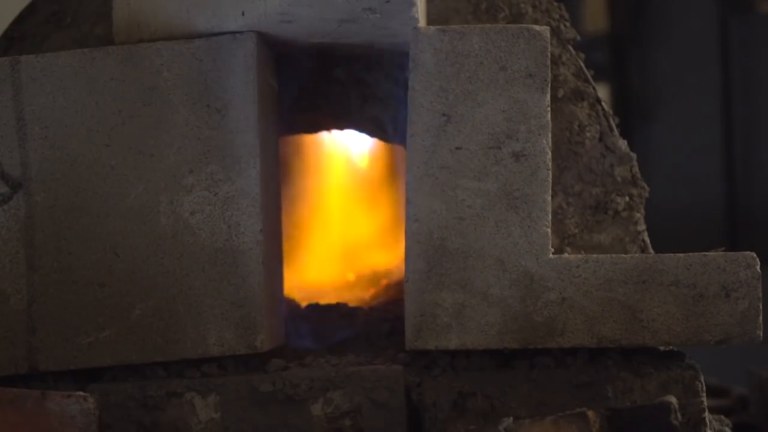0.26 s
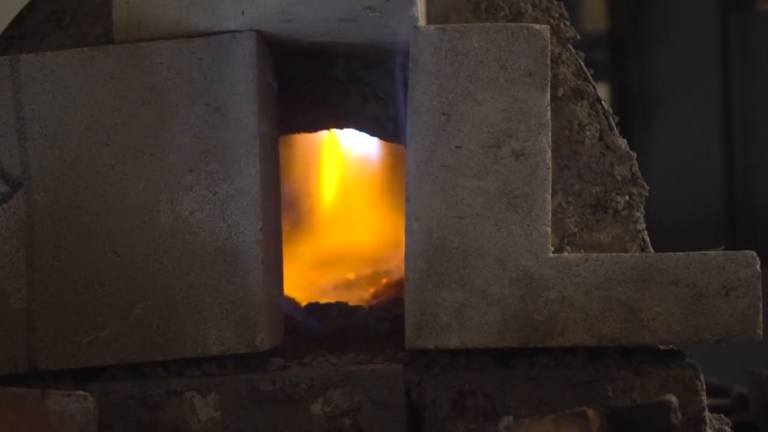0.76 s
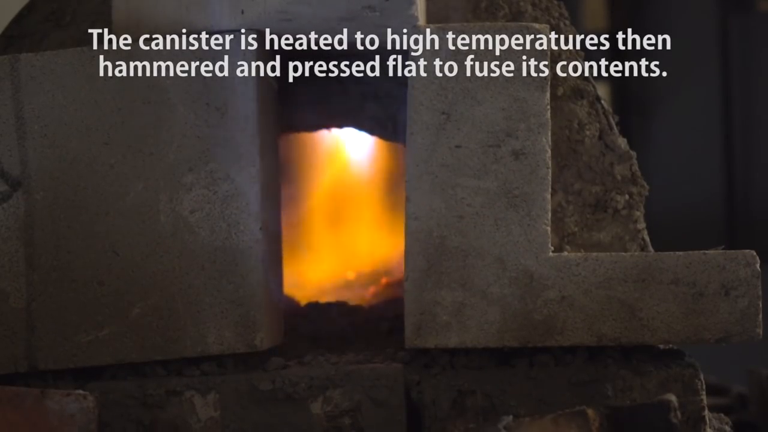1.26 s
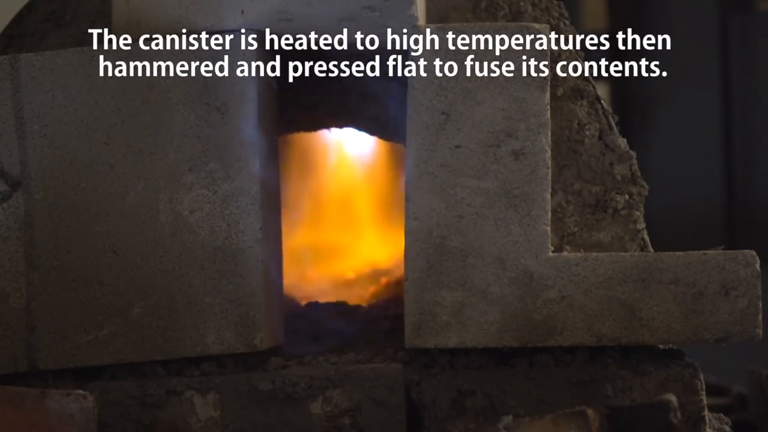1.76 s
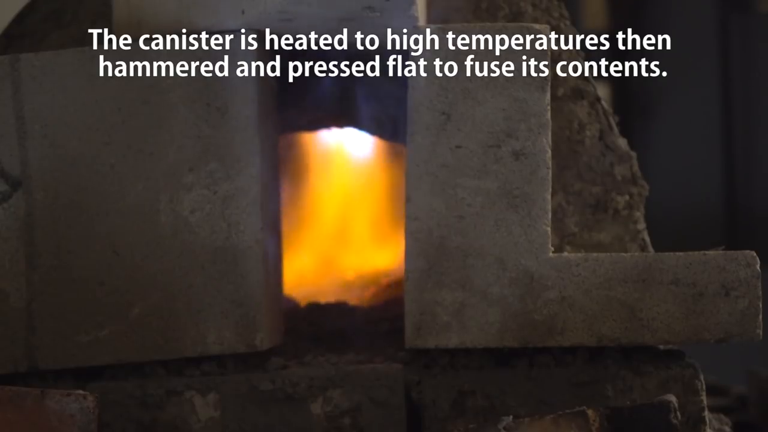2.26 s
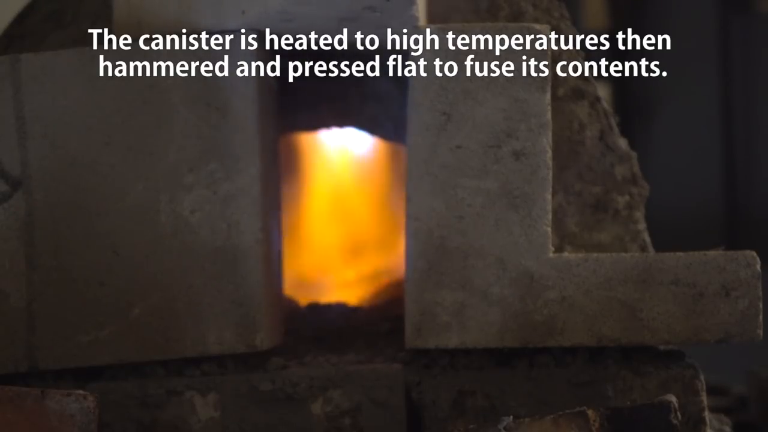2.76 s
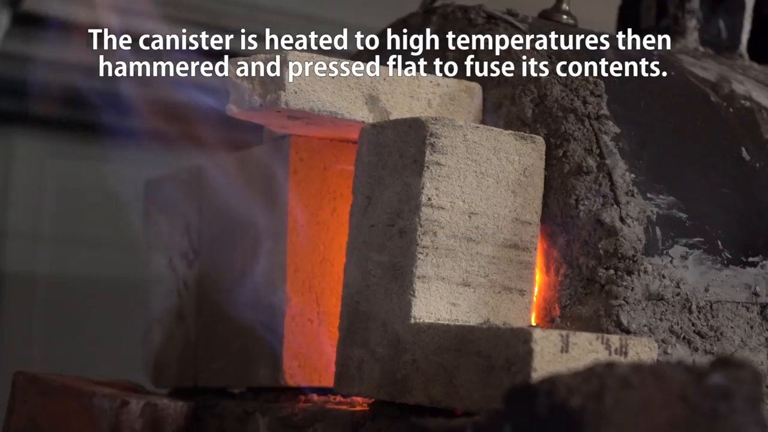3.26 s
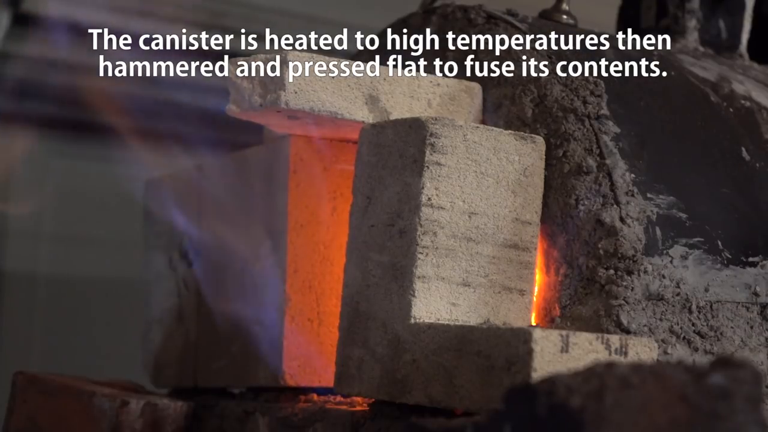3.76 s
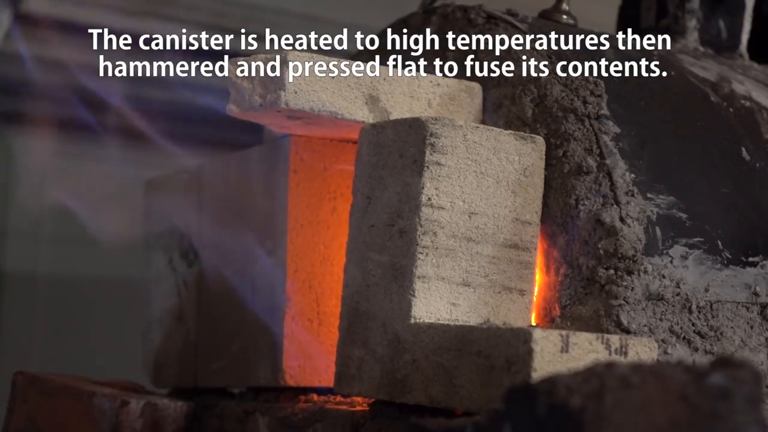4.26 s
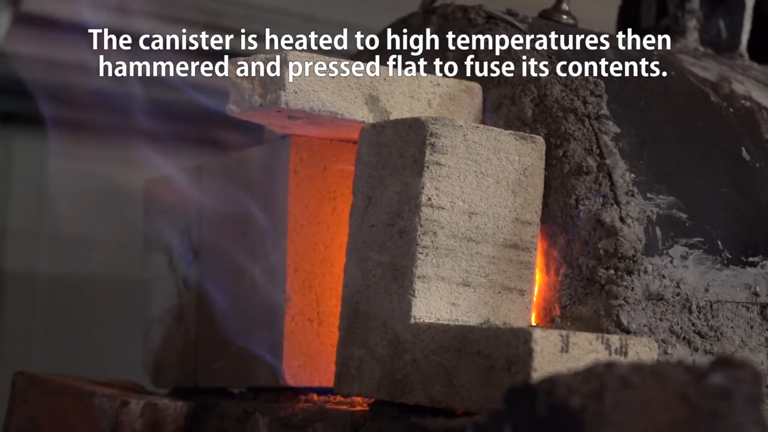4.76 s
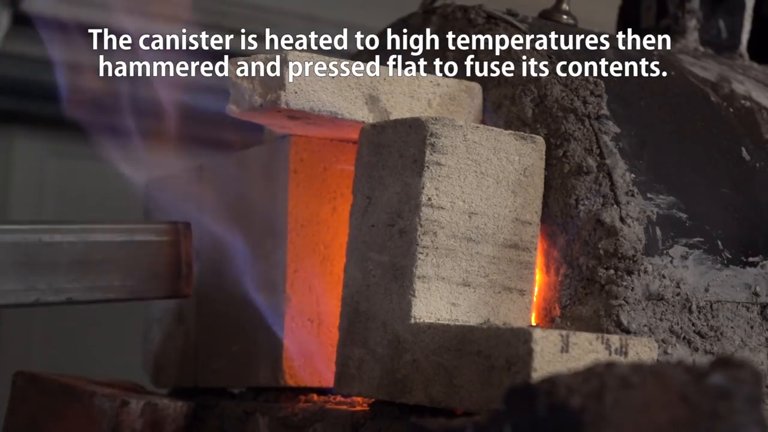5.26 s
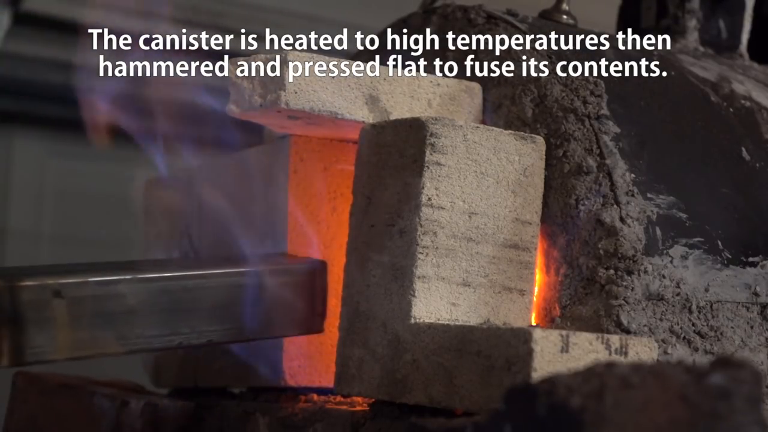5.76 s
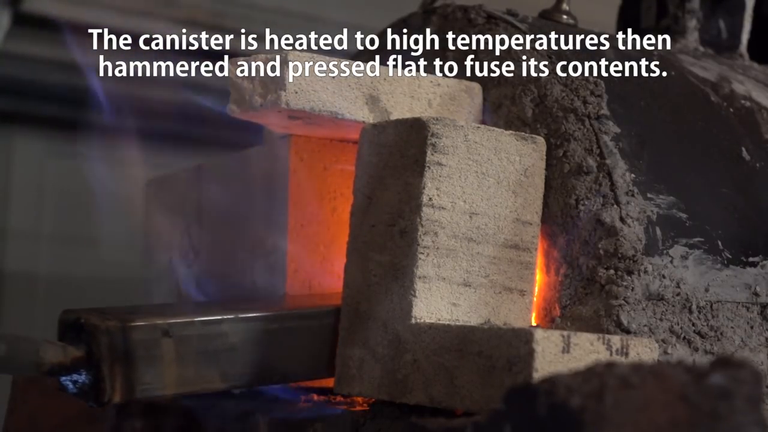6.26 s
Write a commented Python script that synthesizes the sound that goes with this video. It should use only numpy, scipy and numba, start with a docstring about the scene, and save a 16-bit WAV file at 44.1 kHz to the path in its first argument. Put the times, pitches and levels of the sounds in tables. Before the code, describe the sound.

A gas forge roars steadily in a workshop after a split-second motor whine, then turns quieter and duller about halfway through.

```python
"""A motor whines over its whirr for 26 ms, then a firebrick gas forge roars in a workshop.
The flame rumbles in the modes of chamber and room, mid-band noise licks, the jet hisses through the burner
tube; a soft limiter ducks them all together, the hiss included, under each crest of the roar.
At the front of the mouth the jet spits at 1.5 and 2.8 s; from 3 to 3.9 s the front view dissolves
into a side view, where the forge is quieter and differently coloured."""
import sys
import numpy as np
from scipy import signal
from scipy.fft import rfft, irfft, next_fast_len
from scipy.io import wavfile
from scipy.ndimage import uniform_filter1d, minimum_filter1d, map_coordinates
from numba import njit

SR = 44100
rng = np.random.default_rng(int(sys.argv[2]) if len(sys.argv) > 2 else 0)


def file_out(sig):
    """Save sig as 16-bit WAV at sys.argv[1]."""
    # one column per channel
    cols = np.atleast_2d(sig).T
    # limit, then scale
    lim = np.clip(cols, -1, 1)
    pcm = np.round(lim * 32767).astype(np.int16)
    wavfile.write(sys.argv[1], SR, pcm)


N = 287532
TIME_S = np.arange(N) / SR
FFT_LEN = next_fast_len(N)

# slow hand-set level curves about the steady levels: (time [s], hiss level [dB], mid-band noise level [dB])
SLOW_LEVELS = [(.03, 0, 0.5), (.25, 1.5, 2), (.43, -1.5, -1), (.53, 1.5, 2.5), (.66, -0.5, -1), (.85, 2, 2),
               (1.1, 0, 1.5), (1.23, -1, 0.5), (1.36, 1, 2), (1.5, -0.5, 0.5), (1.78, 1.5, 2),
               (1.9, 0.5, 0), (2.0, 1, .5), (2.2, 0, 0), (2.46, -1, -1.5), (2.7, -0.5, 2), (2.85, 0.5, 1.5),
               (2.97, -2, 1), (3.3, 2, 1.5), (3.45, -0.5, 0), (3.7, -0.5, -2), (3.94, 1.5, 0),
               (4.12, 0, -1), (4.32, 1, 0.5), (4.5, -1, -1), (4.7, .5, 0), (5.15, 0.5, -0.5),
               (5.25, -1.5, -3), (5.35, 0, 0), (5.62, 1, 0), (6.0, .3, 0), (6.5, 0.5, -1)]


def amp(db):
    """Decibels to gain."""
    return 10 ** (np.asarray(db) / 20)


def unit(x):
    """Scaled to rms 1."""
    return x / np.sqrt(np.mean(x ** 2) + 1e-20)


def along(points, hz):
    """(Hz, value) points interpolated on a log frequency axis."""
    f, v = np.transpose(points)
    return np.interp(np.log(hz + 1), np.log(f + 1), v)


def curves(rows):
    """One value per sample for each column after the time."""
    s, *cols = np.transpose(rows)
    return [np.interp(TIME_S, s, c) for c in cols]


def placed(pair):
    """A (front, side) value that slides during the dissolve."""
    slide_start_s, slide_end_s = 2.98, 3.89
    return np.interp(TIME_S, (slide_start_s, slide_end_s), pair)


def wobble(rate_hz):
    """Smooth random curve with rate_hz knots a second."""
    knots = rng.standard_normal(int(N * rate_hz / SR) + 4)
    return map_coordinates(knots, [TIME_S * rate_hz])


def filtered(x, response):
    """x through a gain given as a function of Hz."""
    m = next_fast_len(N + 8192)
    return irfft(rfft(x, m) * response(np.fft.rfftfreq(m, 1 / SR)), m)[..., :N]


def motor():
    """Steady partials of a fast shaft over its own whirr of shaped noise."""
    # shaft partials: (frequency [Hz], rms level ahead of the left-right balance [dB])
    partials = [(549.1, -41.5), (721.4, -50.5), (1098, -40.5), (1432, -50), (1798, -58), (2105, -55),
                (3273, -73), (3553, -74), (4430, -66), (5453, -79)]
    # whirr spectrum: (frequency [Hz], relative density [dB])
    whirr_spectrum = [(150, -74), (250, -22), (516, -13), (768, -33), (867, -30), (1100, -14), (1560, -25),
                      (2130, -21), (15500, -40)]
    whirr_db = -44.5
    balance_db = [[.7], [-.7]]  # left, right
    whine = 0
    for hz, db in partials:
        whine = whine + np.sqrt(2) * amp(db) * np.sin(2 * np.pi * (hz * TIME_S + rng.random()))
    noise = rng.standard_normal((2, N))
    whirr = unit(filtered(noise, lambda hz: amp(along(whirr_spectrum, hz))))
    return whine * amp(balance_db) + amp(whirr_db) * whirr


def spit():
    """Short bright puffs in the jet: high-passed noise with exponential rise and decay."""
    # puffs: (start [s], level ahead of trim and envelope [dB], rise [s], t60 [s])
    puffs = [(1.49, -40.5, .02, 0.22), (2.7988, -44, .0005, 0.06)]
    trim_db = -5
    out = np.zeros((2, N))
    for s, db, rise_s, t60_s in puffs:
        age_s = np.maximum(TIME_S - s, 0)
        envelope = amp(db + trim_db - 60 * age_s / t60_s) * (1 - np.exp(-age_s / rise_s))
        out += envelope * rng.standard_normal((2, N))
    return filtered(out, lambda hz: np.clip((hz - 3500) / 2500, 0, 1))


def workshop(hz, t60_s):
    """Direct sound plus a diffuse decaying answer of walls some metres off: stereo response."""
    # answer against direct sound: (frequency [Hz], level [dB])
    echo = [(200, -23.5), (600, -12.5), (1500, -11.5), (6000, -8.5), (15000, -14)]
    build_up_s = 0.016
    t = np.arange(SR // 2) / SR
    envelope = amp(-60 * t / t60_s) * (1 - np.exp(-(t / build_up_s) ** 2))
    tail = rng.standard_normal((2, len(t))) * envelope
    both, apart = rfft(tail / np.linalg.norm(tail[0]), FFT_LEN)
    return 1 + amp(along(echo, hz)) * np.array([both + .3 * apart, both - .3 * apart])


def standpoint(place, t60_s):
    """Modes, walls and two microphone ports at a place (0 front, 1 side): shared and own noise gains."""
    # chamber and workshop modes: (frequency [Hz], width [Hz], front lift [dB], side lift [dB])
    modes = [(65.4, 21, 3, 8), (82.3, 8.6, 5, -2), (130.7, 31, 7, 10), (99, 15, -1.5, -8),
             (147, 9.9, 2.5, -11), (178.6, 22.8, 8, 9.5), (200.9, 19.3, 7, 9), (231.4, 27, 6.5, 4),
             (255.4, 12, 0.5, -0.5), (252, 8.9, -2, 6), (276.5, 19, 1.5, 3), (290, 13, 12.5, 2.5),
             (308.3, 14, -3, 5.5), (309.5, 13.7, 10.5, 2.5), (342, 9.5, 5, 5.5), (390, 10, 1, 1),
             (400, 19, -2.5, 3), (408, 100, 2.5, 4.5), (420, 7.7, 4.5, 1), (451.5, 10.4, 3.5, 6),
             (504, 17, -2, 4), (479.6, 7.7, 9.5, 3.5), (533, 6.4, 8.5, 1), (550, 12, -1.5, 6),
             (478, 20, -5, 5), (548, 63, 0.5, 4.5), (609, 84, 6.5, -6), (671, 38, 5, 8.5), (623, 14, 4, 3),
             (728, 20, 4.5, -2), (768, 46, -3, 7), (793, 16, 7, -5), (872, 21, 5.5, -3), (850, 14, -4.5, 8)]
    # cancelling wall echoes: (frequency [Hz], width [Hz], front lift [dB], side lift [dB])
    cancellations = [(155, 8, -9, -9), (219, 8, -7, -3), (238, 7, 0, -5), (245, 7, -8, 0), (261, 7, 0, -5),
                     (295, 6, -5, -4), (325, 10, -6, -5), (367, 8, -1, -6), (522, 9, -5, -5),
                     (544, 7, -5, 0), (583, 10, 0, -10), (633, 9, 0, -7), (662, 8, 0, -4), (826, 14, 0, -5)]
    # burner tube and brick gap: (frequency [Hz], width [Hz], front lift [dB], side lift [dB])
    tube_modes = [(982, 115, 5, 9), (1287, 155, 9.5, -3.5), (1457, 26, 7, -3), (1612, 190, 7.5, 5),
                  (1735, 82, 0, 2.5), (1984, 69, 1, 5.5), (2250, 96, 8, -1), (2453, 91, 4.5, 8),
                  (3190, 230, 6, 4), (3700, 260, 0, 3.5), (3850, 70, 6, -0.5), (4000, 110, -2, 6.5),
                  (4730, 180, 2, 8.5), (5400, 140, 5.5, 1.5), (6300, 190, 4.5, 3.5), (7420, 870, 6.5, 7.5),
                  (8560, 200, 8, 4), (10700, 250, 1, 2), (12160, 300, 5, 2), (13300, 570, 7.5, 6),
                  (14050, 200, 4, 5), (15250, 400, 8, 4)]
    # left-right likeness of the ports; front, side: (frequency [Hz], correlation [0-1])
    likeness = [
        [(40, 1), (130, 0.99), (290, 0.97), (640, 1), (1400, 0.76), (3100, 0.42), (6800, 0.16), (15000, 0.32)],
        [(40, 0.99), (130, 0.99), (290, 0.97), (640, 0.81), (1400, 0.95), (3100, 0.76), (6800, 0.58),
         (15000, .45)],
    ]
    # port level difference; front, side: (frequency [Hz], left minus right [dB])
    level_skew = [
        [(60, 2.0), (110, 1.5), (200, 1.0), (380, 2.5), (700, 0.5), (1290, 0.5), (2380, 0.0), (4400, 1.0),
         (8120, -0.5), (15000, 3.0)],
        [(60, 2.0), (110, 1.5), (200, 2.0), (380, 1.0), (700, 1.5), (1290, 0.5), (2380, -1.0), (4400, -1.5),
         (8120, -1.0), (15000, 0.5)],
    ]
    # port phase difference; front, side: (frequency [Hz], left lead [rad])
    phase_skew = [
        [(50, 0.22), (130, 0.4), (260, 0.52), (2000, 0.29), (5000, 1), (15000, .4)],
        [(50, .25), (130, .45), (430, 0.51), (2500, 0.15), (6500, -0.086), (15000, -1.1)],
    ]
    hz = np.fft.rfftfreq(FFT_LEN, 1 / SR)
    lift_db = 0
    for centre_hz, width_hz, *lift in modes + cancellations + tube_modes:
        lift_db = lift_db + lift[place] / (1 + (2 * (hz - centre_hz) / width_hz) ** 2)
    # half of each difference per port
    skew = amp(along(level_skew[place], hz) / 2) * np.exp(.5j * along(phase_skew[place], hz))
    ports = amp(lift_db) * workshop(hz, t60_s) * [skew, 1 / skew]
    # own noise enters the ports in opposite sign; the angle sets their correlation
    turn = np.arccos(np.clip(along(likeness[place], hz), 0, 1)) / 2
    return hz, ports * np.cos(turn), ports * np.sin(turn) * [[1], [-1]]


def rush(spectrum, place, patchy_db, frames):
    """Turbulent stereo noise of rms 1, with patches of random gain, as heard from a place."""
    z = signal.stft(rng.standard_normal((2, N)), nperseg=512)[2]
    field = rng.standard_normal(z.shape[1:])
    field = uniform_filter1d(field, size=8, axis=0)  # across frequency
    field = uniform_filter1d(field, size=frames, axis=1)  # across time
    pair = signal.istft(z * amp(patchy_db * unit(field)), nperseg=512)[1][:, :N]
    hz, shared_gain, own_gain = place
    shared, own = rfft(pair, FFT_LEN) * amp(along(spectrum, hz))
    return unit(irfft(shared * shared_gain + own * own_gain, FFT_LEN)[:, :N])


def dissolved(spectra, places, patchy_db, frames):
    """Power crossfade of independent front and side noises; gain patches smoothed over frames of 6 ms."""
    # dissolve between the two views: (time [s], side share of power [0-1])
    dissolve = [(3.0, 0.03), (3.3, 0.2), (3.5, 0.47), (3.62, 0.82)]
    share = curves(dissolve)[0]
    front, side = [rush(spectrum, place, patchy_db, frames) for spectrum, place in zip(spectra, places)]
    return np.sqrt(1 - share) * front + np.sqrt(share) * side


@njit
def held(size, rise, fall):
    """Peak follower: quick up, slow down; rise and fall are coefficients per sample."""
    out, level = np.empty_like(size), 0.
    for i in range(len(size)):
        level += (rise if size[i] > level else fall) * (size[i] - level)
        out[i] = level
    return out


def limited(x, top, ahead_s, release_s):
    """Gain drops just before a crest passes the threshold and recovers after it, alike on both channels."""
    grip = .55  # share of the dB over the threshold taken away
    lead = round(ahead_s * SR) + 1
    level = held(np.abs(x).max(axis=0), 0.75, 1 / (release_s * SR + 1))
    gain = np.minimum(1, top / (level + 1e-9)) ** grip
    needed = minimum_filter1d(gain, 2 * lead + 1)
    return x * uniform_filter1d(needed, 2 * lead + 1)


def jet(places):
    """Gas hissing through the burner tube: patchy noise with a slow level curve and a faster wobble."""
    # hiss spectrum; front, side: (frequency [Hz], relative density [dB])
    hiss_spectra = [
        [(2000, -42), (3500, 3.5), (4300, -1.5), (5500, -12), (9500, -10.5), (11500, -12.5), (16000, -15)],
        [(2000, -24), (3500, -1), (4300, -9.5), (5500, -11), (9500, -11.5), (11500, -13), (16000, -10.5)],
    ]
    level_db = placed((-57, -58.5)) + curves(SLOW_LEVELS)[0] + 0.25 * wobble(30)
    return amp(level_db) * dissolved(hiss_spectra, places, patchy_db=1.4, frames=20)


def tongue(places):
    """Licking flame: patchy mid-band noise with a slow level curve."""
    # flame spectrum; front, side: (frequency [Hz], relative density [dB])
    lick_spectra = [
        [(400, -42), (800, -0.5), (1200, -7), (1800, -5.5), (2700, -10.5), (4000, -21.5), (5000, -38)],
        [(400, -47), (800, -14), (1200, -1), (1800, -6), (2700, -8.5), (4000, -22), (5000, -51)],
    ]
    level_db = placed((-47.5, -53)) + curves(SLOW_LEVELS)[1]
    return amp(level_db) * dissolved(lick_spectra, places, patchy_db=0.93, frames=10)


def roar_level():
    """Slow level of the roar in dB ahead of the limiter, with brief Gaussian sags."""
    # sags: (time [s], depth [dB])
    sags = [(.15, 0.4), (2.5, 0.5), (3.78, 2), (5.6, 1), (6.05, 2)]
    sag_half_width_s = 0.094  # to 1/e of the depth
    level_db = placed((-25.5, -32))
    for s, depth_db in sags:
        level_db = level_db - depth_db * np.exp(-((TIME_S - s) / sag_half_width_s) ** 2)
    return level_db


def roar(places):
    """Flame rumbling in the chamber: low noise whose upper part has its own slow level curve."""
    # rumble spectrum; front, side: (frequency [Hz], relative density [dB])
    rumble_spectra = [
        [(20, -47), (40, -35), (55, -16.5), (100, -12.5), (160, -8), (270, -5.5), (330, -11.5), (500, -14),
         (720, -24.5), (1100, -36), (2000, -62)],
        [(20, -43), (40, -50), (55, -20.5), (100, -18), (160, -12.5), (270, -6), (330, -11.5), (500, -19.5),
         (720, -24.5), (1100, -39), (2000, -61.5)],
    ]
    # upper part about its steady level: (time [s], level [dB])
    upper_levels = [(.03, -2.5), (.33, 1), (.55, -0.5), (.65, -5), (.8, 0), (.97, -2), (1.08, 2),
                    (1.47, -0.5), (1.65, 0.5), (1.78, 2), (1.92, 0.5), (2.25, 1), (2.45, -1), (2.75, 0.5),
                    (2.95, -1), (3.3, 0.5), (3.75, 0), (4.3, 0.5), (4.95, .5), (5.35, -0.5), (5.65, 1),
                    (6.05, -0.5), (6.3, 0), (6.5, 0.5)]
    upper_hz = 330
    rumble = dissolved(rumble_spectra, places, patchy_db=0.58, frames=8)
    upper = filtered(rumble, lambda hz: 1 / (1 + (upper_hz / (hz + 1)) ** 8))
    return rumble + (amp(curves(upper_levels)[0]) - 1) * upper


def forge():
    """Roar, tongue and jet through one limiter whose threshold rides with the roar's slow level."""
    headroom = placed((1.625, 2.04))  # threshold over the roar's slow rms level
    places = [standpoint(place, t60_s=0.14) for place in range(2)]
    roar_gain = amp(roar_level())
    flame = roar(places) + (tongue(places) + jet(places)) / roar_gain
    return roar_gain * limited(flame, top=headroom, ahead_s=0.0013, release_s=0.03)


def scene():
    """The motor gives way to the forge within 3 ms; the spits are added on top."""
    cut_s, fade_s = 0.0263, 0.0028
    over = np.clip((TIME_S - cut_s) / fade_s + .5, 0, 1)
    return (1 - over) * motor() + over * forge() + spit()


def record(dry):
    """Nothing is kept above the band limit."""
    top_hz = 15741
    return filtered(dry, lambda hz: hz < top_hz)


dry = scene()
out = record(dry)
file_out(out)
```